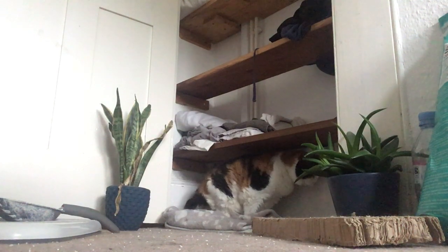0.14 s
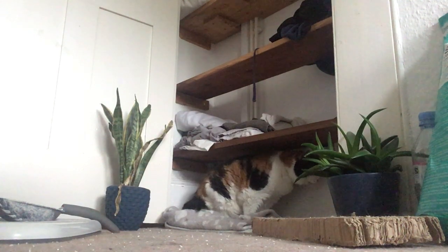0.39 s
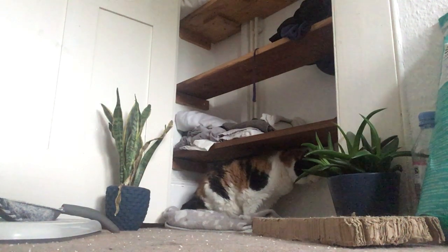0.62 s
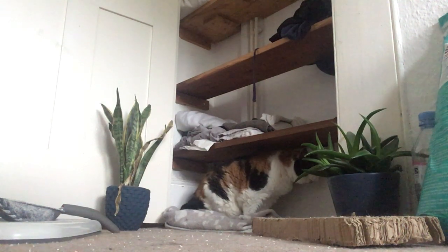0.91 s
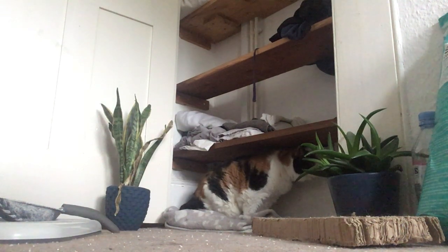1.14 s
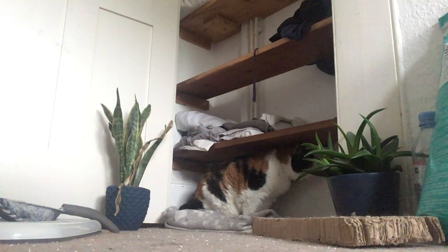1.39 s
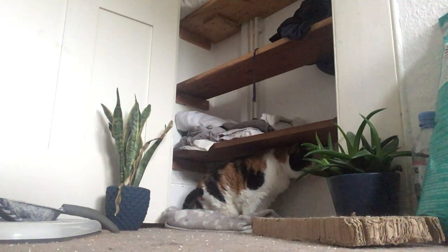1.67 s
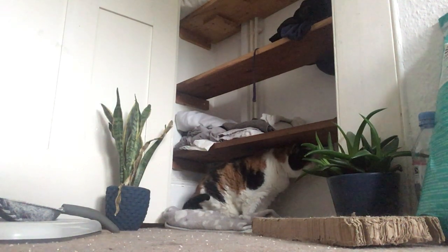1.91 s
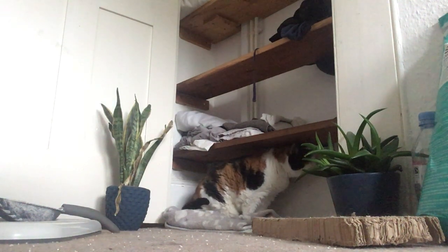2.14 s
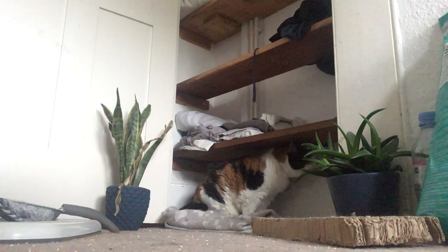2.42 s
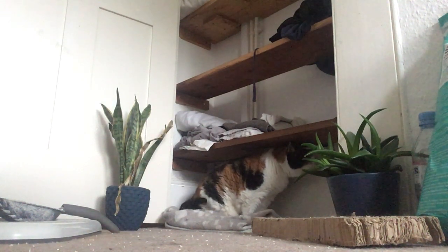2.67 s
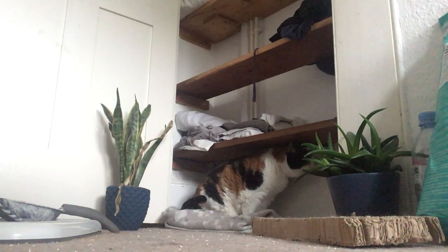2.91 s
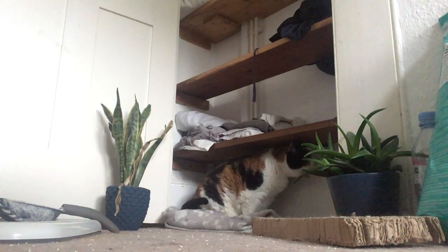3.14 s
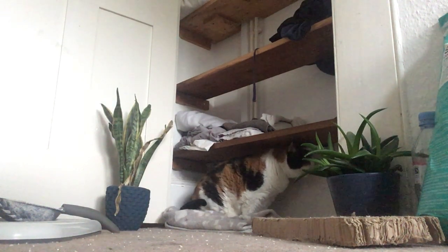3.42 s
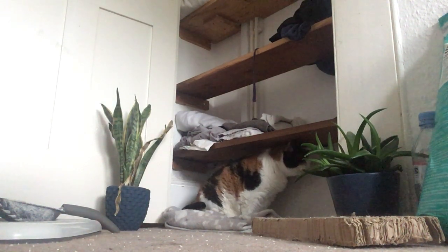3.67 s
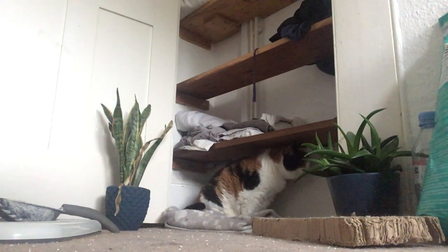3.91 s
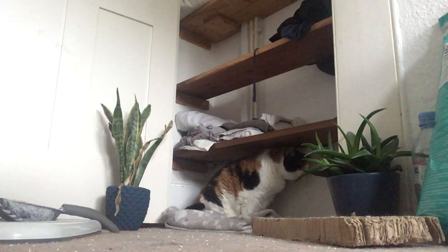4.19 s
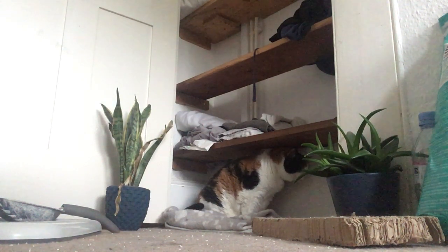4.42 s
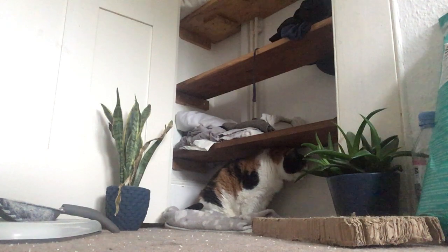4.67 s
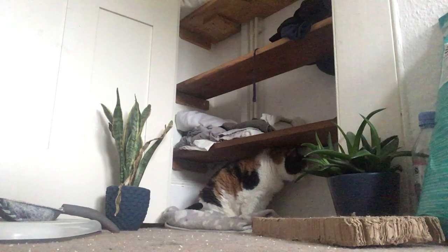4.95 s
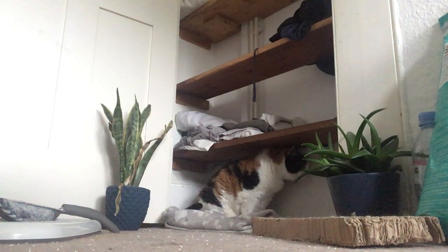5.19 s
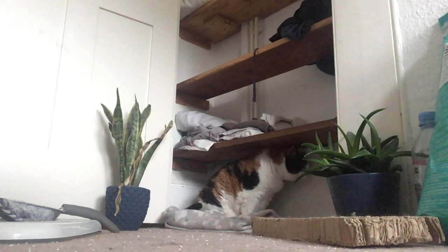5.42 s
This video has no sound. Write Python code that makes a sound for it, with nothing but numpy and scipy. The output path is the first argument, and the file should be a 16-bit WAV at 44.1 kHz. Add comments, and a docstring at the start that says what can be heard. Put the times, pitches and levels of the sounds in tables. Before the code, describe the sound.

A single cat yowls loudly indoors, starting almost at once with a rough, rising and falling cry of about a second. A small grunt ends it; after a pause and faint throat sounds a second, slightly shorter yowl follows. Then quiet, and near the end a low, fluttering closed-mouth trill. Small room with short reflections, boxy ring from a shelf niche, low rumble and light microphone hiss.

```python
"""Cat yowling in a shelf niche

A cat crouched in a wooden niche yowls twice, with small grunts around the calls, and ends on a closed-mouth trill.
Yowls are stacks of partials shaped by mouth and throat, roughened by phase jumps and rasping air; the trill
is a hum chopped by a flutter, the grunts are short decaying tones with a rasp.
The niche rings after the yowls, feedback delays make the room; shaped noise gives low rumble and microphone hiss.
"""
import sys
import numpy as np
from scipy import signal
from scipy.fft import rfft, irfft, next_fast_len
from scipy.io import wavfile

SR = 44100
rng = np.random.default_rng(int(sys.argv[2]) if len(sys.argv) > 2 else 0)


def bounce(signal):
    """Save signal as a 16-bit WAV file at the path given by the first command-line argument."""
    frames = np.transpose(np.atleast_2d(signal))
    limited = np.clip(frames, -1, 1)
    pcm = np.round(limited * 32767).astype(np.int16)
    wavfile.write(sys.argv[1], SR, pcm)


def invert_db(level):
    """Linear amplitude ratio for a level in decibels (20 dB per decade), elementwise."""
    return 10 ** (np.asarray(level, dtype=float) / 20)


N = 245637


def rms_one(x):
    """Scale to unit power."""
    return x / np.sqrt(np.mean(x ** 2) + 1e-20)


def in_time(rows):
    """Columns of a curve over time, one value a sample."""
    s, *columns = np.transpose(rows)
    return [np.interp(np.arange(N) / SR, s, c) for c in columns]


def sounding(rows):
    """One while the call lasts, with soft ends."""
    start, end = rows[0][0], rows[-1][0]
    return np.interp(np.arange(N) / SR, [start, start + 0.0027, end - .02, end], [0, 1, 1, 0])


def at_hz(points, hz):
    """Read a spectrum on a log frequency axis."""
    points = np.array(points)
    return np.interp(np.log(hz), np.log(points[:, 0]), points[:, 1])


def wobble(hz):
    """Slow random drift: noise twice through a one-pole low-pass, spread 1."""
    r = np.exp(-2 * np.pi * hz / SR)
    return rms_one(signal.lfilter([1], [1, -2 * r, r * r], rng.standard_normal(N)))


def resonance(x, hz, width_hz):
    """Two-pole band-pass with gain 1 on top."""
    r = np.exp(-np.pi * width_hz / SR)
    poles = [1, -2 * r * np.cos(2 * np.pi * hz / SR), r * r]
    return signal.lfilter([(1 - r * r) / 2, 0, (r * r - 1) / 2], poles, x + 1e-18)


def peak(hz, top_hz, width_hz):
    """Gain of a resonance at hz: 1 on top, a half at width_hz to either side."""
    return 1 / (1 + ((hz - top_hz) / width_hz) ** 2)


# spectrum of rumble and hiss before levelling: frequency_hz, density_db (per Hz)
FLOOR_SPECTRUM = [(25, -18.5), (44, -0.5), (96, -5), (332, -16.5), (1000, -23), (4900, -32), (9350, -31.5),
                  (15600, -38)]
FLOOR_DB = -49


def background():
    """Rumble of the house and microphone hiss as coloured noise; the rumble swells and sinks."""
    hz = np.maximum(np.arange(N // 2 + 1) * SR / N, 1)
    coloured = rfft(rng.standard_normal(N)) * invert_db(at_hz(FLOOR_SPECTRUM, hz))
    rumble = irfft(coloured / (1 + (hz / 250) ** 4), N)
    swell = invert_db(1.8 * wobble(4.7))
    return invert_db(FLOOR_DB) * rms_one(irfft(coloured, N) + rumble * (swell - 1))


ROOM_DB, ROOM_T60_S, WALL_CUT_HZ = -15, 0.27, 8000  # T60 holds for the bass; the walls dull the treble


def room(x):
    """Ten feedback delays, duller on every round, evaluated on a frequency grid; little bass returns."""
    x = signal.lfilter(*signal.butter(1, 500., "high", fs=SR), x)
    size = next_fast_len(N + SR)
    w = 2 * np.pi * np.arange(size // 2 + 1) / size
    hz = w * SR / (2 * np.pi)
    response = 0
    for k, lag_s in enumerate(rng.uniform(.008, .03, size=10)):
        wall = invert_db(-60 * lag_s / ROOM_T60_S) / np.sqrt(1 + (hz / WALL_CUT_HZ) ** 2)
        loop = wall * np.exp(-1j * w * lag_s * SR)
        response = response + (-1) ** k * loop / (1 - loop)
    return invert_db(ROOM_DB) * irfft(rfft(x, size) * response, size)[:N]


# hollow between the boards: frequency_hz, width_hz, ring_db
NICHE_RINGS = [(859.4, 44, 4.5), (1126.7, 15, 16)]


def niche(x):
    """Ring of the hollow between the boards, as narrow band-passes."""
    return sum(invert_db(db) * resonance(x, hz, width) for hz, width, db in NICHE_RINGS)


# short grunts, gulps and a lip tick: start_s, drive_db (before the soft onset), pitch_hz, t60_s
GRUNT_HITS = [(1.055, -18.5, 397, 0.035), (2.528, -24.5, 704, 0.077), (2.539, -24, 227, 0.024),
              (1.477, -30.5, 312, 0.059), (1.5, -35.5, 386.7, 0.091), (4.836, -27, 404, 0.049),
              (4.85, -24.5, 191, 0.053), (4.881, -29, 287, 0.093), (5.4, -26.5, 880, 0.017),
              (5.414, -20.5, 653, 0.063), (5.438, -43, 5240, .05), (5.495, -27, 845, 0.015)]


def grunts():
    """A soft push rings the throat for a few cycles: a decaying tone with a noisy rasp."""
    out = np.zeros(N)
    for s, db, hz, t60 in GRUNT_HITS:
        t = np.arange(round(.15 * SR)) / SR
        shape = (1 - np.exp(-t / .003)) * invert_db(-60 * t / t60)
        rasp = resonance(resonance(rng.standard_normal(len(t)), 430, 530), 430, 530)
        tone = np.sin(2 * np.pi * hz * t)
        at = round(s * SR)
        out[at:at + len(t)] += (invert_db(db) * shape * (tone + 1.4 * rasp))[:N - at]
    return out


# closed-mouth trill: time_s, pitch_hz, fundamental_db, overtone_drive_db
TRILL_CURVE = [(4.905, 394, -34, -60), (4.918, 383.3, -27, -45), (4.95, 374.4, -20.5, -40.5),
               (5.0, 336.5, -24, -45.5), (5.09, 373, -23, -49), (5.22, 329, -28.5, -49),
               (5.394, 362.5, -34.5, -54.5), (5.406, 375, -19, -41), (5.445, 360.3, -26, -69)]
# the throat flutters shut: time_s, depth (0-1, neighbours add up)
TRILL_FLUTTERS = [(4.963, .9), (4.995, .85), (5.028, .8), (5.043, .6), (5.063, .95), (5.098, .95),
                  (5.135, .7), (5.178, .4), (5.419, .8)]


def trill():
    """A hummed note behind closed lips, chopped by a flutter in the throat."""
    pitch_hz, first_db, over_db = in_time(TRILL_CURVE)
    t = np.arange(N) / SR
    closed = sum(depth * np.exp(-((t - s) / 0.0078) ** 2) for s, depth in TRILL_FLUTTERS)
    closed = np.clip(closed, 0, 1)
    cycles = np.cumsum(pitch_hz) / SR + 0.013 * wobble(73.0) + 0.07 * closed * wobble(270.0)
    hum = invert_db(first_db) * (1 - closed) * np.sin(2 * np.pi * cycles)
    over = sum(invert_db(-3. * k) * invert_db(5.3 * wobble(27)) * np.sin(2 * np.pi * k * cycles) for k in (2, 3, 4))
    # around 5 s the overtones break up into a rattle
    creaky = np.exp(-((t - 5) / .085) ** 4)
    over = over * (1 - .85 * creaky)
    rasp = resonance(resonance(rng.standard_normal(N), 700, 700), 900, 700)
    rattle = (.3 * creaky + .6 * closed) * invert_db(5 * wobble(120)) * rasp
    voice = (hum + invert_db(over_db) * (over + invert_db(20.5) * rattle)) * sounding(TRILL_CURVE)
    return signal.sosfilt(signal.butter(4, 1450, fs=SR, output="sos"), voice)  # closed lips


# spells where the folds stumble and the voice crackles: start_s, end_s, largest_jump_cycles
CRACKLE_SPELLS = [(.765, 1.04, .018), (1.7, 1.83, .022), (1.9, 1.96, .035), (.244, .266, .25),
                  (.29, .43, .05), (.572, .586, .1), (.722, .764, .24), (2.224, 2.245, .2),
                  (2.29, 2.335, .045), (2.528, 2.56, .3), (1.04, 1.06, .3)]
STUMBLES_PER_S, STUMBLE_S = 220, .0007  # mean rate inside a spell, half-length of each


def stumbles():
    """Sudden random jumps of the overtones' phase inside the crackling spells, and the dip of strength at each."""
    t, size = np.arange(N) / SR, np.zeros(N)
    for start, end, cycles in CRACKLE_SPELLS:
        size[(t > start) & (t < end)] = cycles
    hit = rng.random(N) < STUMBLES_PER_S / SR
    jumps = size * hit * rng.uniform(.4, 1, N) * rng.choice([-1, 1], N)
    bump = np.exp(-(np.arange(-150, 151) / SR / STUMBLE_S) ** 2)
    jumped = np.cumsum(np.convolve(jumps, bump / bump.sum(), "same"))
    return jumped, np.convolve(np.abs(jumps), bump, "same")


# the folds catch and slip for a moment: time_s, slip_cycles
FOLD_CATCHES = [(0.247, 0.3), (1.751, 0.13), (1.778, 0.15)]
CATCH_S = .005
# slack folds (low pitch) roughen, a hard push steadies them
TAUT_HZ, SLACK_HZ, PUSHED_DB, RELAXED_DB = 465, 390, -19, -27
CLEAN, ROUGHEST = .03, .12  # roughness always there, and the most that slackness adds
ALTERNATE_S, ALTERNATE_FOR_S, ALTERNATE_CYCLES = 1.832, .066, .03  # a spell of early-late pulses


def folds(pitch_hz, first_db):
    """Phase (cycles) and strength of the vocal folds: wavering, catches, stumbles and alternating pulses."""
    t, slip, caught = np.arange(N) / SR, np.zeros(N), np.zeros(N)
    slack = np.interp(pitch_hz, [SLACK_HZ, TAUT_HZ], [1, 0])
    relaxed = np.interp(first_db, [RELAXED_DB, PUSHED_DB], [1, 0])
    alternate = np.exp(-(2 * (t - ALTERNATE_S) / ALTERNATE_FOR_S - 1) ** 4)
    # alternating folds lock in step
    rough = (CLEAN + ROUGHEST * slack * relaxed) * (1 - .75 * alternate)
    jumped, dipped = stumbles()
    for s, cycles in FOLD_CATCHES:
        slip += cycles * np.tanh(2 * (t - s) / CATCH_S) / 2
        caught += cycles * np.exp(-((t - s) / CATCH_S) ** 2)
    steady = np.cumsum(pitch_hz) / SR
    shaky = .1 * rough * wobble(22.) + (.022 * rough + .2 * caught) * wobble(160.)
    cycles = steady + slip + shaky + ALTERNATE_CYCLES * alternate * np.sin(np.pi * steady)
    strength = invert_db(-20. * caught + 5.2 * rough * wobble(69.0)) * invert_db(-35 * dipped)
    uneven = .55 * rough + .3 * caught
    return cycles, jumped, strength, uneven, rough


# overtones leaving the head: frequency_hz, gain_db
HEAD_GAIN = [(700, -19.5), (870, -1.5), (980, -2.5), (1120, -1.5), (1250, -11.5), (1600, -7), (1950, -28),
             (2400, -39), (3300, -11), (4700, -46.5)]
# tongue resonance by where it lies: frequency_hz, gain_db
TONGUE_GAIN = [(1550, -4.5), (2100, -16.5), (2800, -4)]
TONGUE_WIDTH_HZ, JAW_DB, JAW_WIDTH_HZ = 208, 8, 79.5


def mouth_gain(hz, jaw_hz, tongue_hz, tongue_db, hollow):
    """Head colour with moving jaw and tongue resonances, which partly cancel midway between them."""
    midway_hz = 0.973 * np.sqrt(jaw_hz * tongue_hz)
    jaw = 1 + invert_db(JAW_DB) * peak(hz, jaw_hz, JAW_WIDTH_HZ)
    cancelled = 1 - np.clip(hollow, 0, 1) * peak(hz, midway_hz, 120.0)
    # overtones fall away above the tongue resonance
    fall = invert_db(-12. * np.clip((hz - tongue_hz) / 400, 0, 1))
    tongue = invert_db(tongue_db + at_hz(TONGUE_GAIN, tongue_hz)) * peak(hz, tongue_hz, TONGUE_WIDTH_HZ) ** 2
    return invert_db(at_hz(HEAD_GAIN, hz)) * jaw * cancelled * fall + tongue


# throat resonances: frequency_hz, width_hz
THROAT_TREBLE = [(4000, 340), (6450, 590), (8900, 700)]
# level of the very top resonance: time_s, level_db
VERY_TOP = [(1.95, -90), (2.12, -65), (2.28, -78), (2.36, -52), (2.45, -108)]


def throat_resonances(treble_db, first_db, on):
    """Treble resonances of the throat (Hz, width, gain); the very top one rises in pitch with the push."""
    throat = [(hz, width, invert_db(db)) for (hz, width), db in zip(THROAT_TREBLE, treble_db)]
    throat.append((13800 + 90 * first_db, 1200, invert_db(in_time(VERY_TOP)[0][on])))
    return throat


def breath(cycles, drive, throat, rough, uneven):
    """Air rushing through the folds, modulated once a cycle, rings the throat; rough folds add a pharynx rasp."""
    air = rng.standard_normal(len(cycles)) * (1 + 9.1 * np.cos(2 * np.pi * cycles))
    out = np.zeros(len(cycles))
    for hz, width, gain in throat:
        hz = np.mean(hz)
        out += (.15 + 3.5 * rough) * gain * resonance(resonance(air, hz, 2 * width), hz, 2 * width)
    rasp = resonance(resonance(air, 1100, 250), 850, 1400)
    return out + invert_db(11.) * drive * (0.0086 + uneven) * rasp


# two yowls: time_s, pitch_hz, fundamental_db (rms)
YOWL_CURVES = [
    [(0.078, 392, -28.5), (0.225, 406, -24), (0.275, 387.3, -31), (0.32, 438.6, -31.5), (0.46, 490, -36),
     (0.55, 487, -33.5), (0.69, 466, -33), (0.77, 443, -29.5), (0.82, 404, -27), (0.91, 388, -22.5),
     (.98, 402.7, -31.5), (1.02, 426.7, -38), (1.06, 416, -55)],
    [(1.645, 416, -53), (1.663, 415.7, -31), (1.69, 406.7, -29.5), (1.715, 387.6, -28), (1.885, 391.8, -29),
     (1.96, 451.6, -34.5), (2.1, 462.6, -35), (2.21, 470, -29), (2.285, 428.2, -22.5), (2.32, 374.3, -19),
     (2.37, 379, -18), (2.43, 365.5, -15), (2.5, 385.6, -25.5), (2.56, 390.5, -38)],
]
# the mouth in each yowl: time_s, overtones_let_out_db, jaw_hz, tongue_hz
MOUTH_MOVES = [
    [(.078, -29.5, 895, 1360), (.236, -15.5, 1000, 1180), (.252, 1, 1025, 1880), (.32, 0.5, 1274, 2486),
     (.42, 8, 1467, 2680), (.55, 9.5, 1386, 2715), (.69, 6, 883.3, 2657), (.78, 2.5, 650, 1910),
     (.84, 0.5, 1010, 1593), (1.06, -3, 763, 1250)],
    [(1.665, -11.5, 940, 1600), (1.7, -3, 1020, 1800), (1.74, 1.5, 1160, 1604), (1.82, 1.5, 1207, 2330),
     (1.95, 4, 1334, 2754), (2.1, 11, 1281, 2963), (2.2, 9.5, 1100, 2605), (2.28, 3, 928, 2185),
     (2.33, -2.5, 956, 1620), (2.43, -3.5, 937, 1452), (2.56, -6, 900, 1350)],
]
# level in each throat resonance, for each yowl: time_s, low_db, middle_db, high_db
THROAT_SHINE = [
    [(.24, -82, -85, -92), (.262, -50, -69.5, -70.5), (.34, -48.5, -61.5, -94), (.5, -53.5, -57, -76),
     (.68, -45, -69, -60), (.85, -57, -68, -70.5), (1.05, -80, -68, -80)],
    [(1.68, -62, -85, -86), (1.75, -55, -62.5, -84), (1.87, -44.5, -54.5, -58), (1.93, -51.5, -66, -69),
     (2.13, -36.5, -59, -66.5), (2.23, -47, -73, -50.5), (2.38, -50, -55.5, -60.5), (2.47, -67, -54, -70),
     (2.56, -78, -80, -80)],
]
# strength of the tongue resonance in each yowl: gain_db
TONGUE_STRENGTH = [2.5, 5]
# how fully jaw and tongue resonances cancel midway, in each yowl: depth (0-1)
MIDWAY_CANCEL = [0, 0.74]


def yowl(rows, mouth, shine, tongue_db, hollow):
    """A stack of partials; the overtones pass the head, the jaw and tongue resonances and those of the throat."""
    on = slice(round(rows[0][0] * SR), round(rows[-1][0] * SR))
    pitch_hz, first_db = in_time(rows)
    cycles, jumped, strength, uneven, rough = folds(pitch_hz, first_db)
    pitch_hz, first_db, cycles, jumped, uneven, rough = [
        x[on] for x in (pitch_hz, first_db, cycles, jumped, uneven, rough)]
    open_db, jaw_hz, tongue_hz, *treble_db = [column[on] for column in in_time(mouth) + in_time(shine)]
    drive = invert_db(first_db + open_db)
    throat = throat_resonances(treble_db, first_db, on)
    out, flutter = np.zeros(N), np.clip(wobble(18.0), -2, 1)
    for k in range(1, 35):
        hz = k * pitch_hz
        # a closing mouth takes the high overtones first
        muffle = invert_db(0.71 * (k - 2.5) * np.minimum(open_db, 0))
        level = drive * muffle * mouth_gain(hz, jaw_hz, tongue_hz, tongue_db, hollow)
        level = level + sum(gain * peak(hz, top, width) ** 2 for top, width, gain in throat)
        # each overtone flutters at its own times, the high ones more
        level = level * invert_db((min(.4 * k, 6) + 12 * rough) * np.roll(flutter, 9000 * k)[on])
        # slack folds lose their upper middle overtones
        level = level * invert_db(-45 * rough * np.clip(hz / 1000 - 2, 0, 2) * (hz < 5000))
        if k == 1:
            level = invert_db(first_db)  # the fundamental bypasses mouth and throat
        phase = 2 * np.pi * (k * cycles + (k - 1) * jumped) + 0.53 * k * k
        out[on] += np.sqrt(2) * level * np.sin(phase)
    out[on] += breath(cycles, drive, throat, rough, uneven)
    # a small throat radiates no bass
    out = signal.sosfilt(signal.butter(4, 290, "high", fs=SR, output="sos"), out)
    return out * strength * sounding(rows)


def scene():
    """The cat in its niche, the room and the floor; the niche rings only on the yowls."""
    calls = zip(YOWL_CURVES, MOUTH_MOVES, THROAT_SHINE, TONGUE_STRENGTH, MIDWAY_CANCEL)
    yowls = sum(yowl(*call) for call in calls)
    boxed = yowls + niche(yowls) + trill() + grunts()
    return (boxed + room(boxed) + background())[None]


# dips of the microphone port: frequency_hz, width_hz, depth (0-1)
PORT_DIPS = [(5000, 1240, .5), (10500, 510, 0.4)]


def roll_off(x):
    """The treble ends steeply here."""
    return signal.sosfilt(signal.butter(12, 15740, fs=SR, output="sos"), x)


def record(dry):
    """The lowest bass is cut and the microphone port dips two bands."""
    x = signal.sosfilt(signal.butter(2, 35., "high", fs=SR, output="sos"), dry[0])
    for hz, width, depth in PORT_DIPS:
        x = x - np.clip(depth, 0, 1) * resonance(x, hz, width)
    return roll_off(x[None])


dry = scene()
out = record(dry)
bounce(out)
```